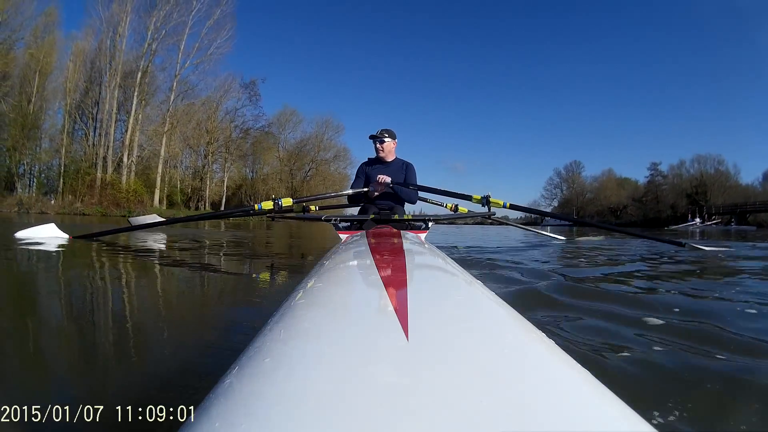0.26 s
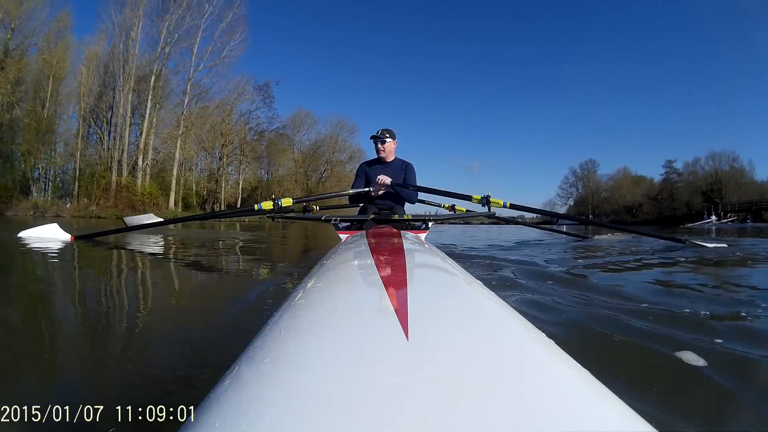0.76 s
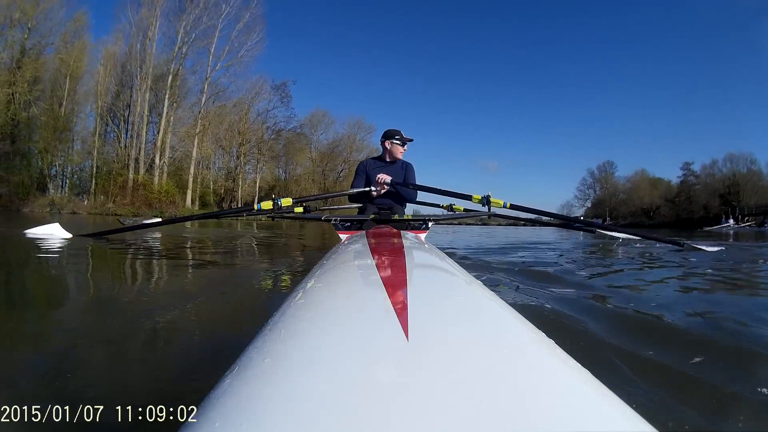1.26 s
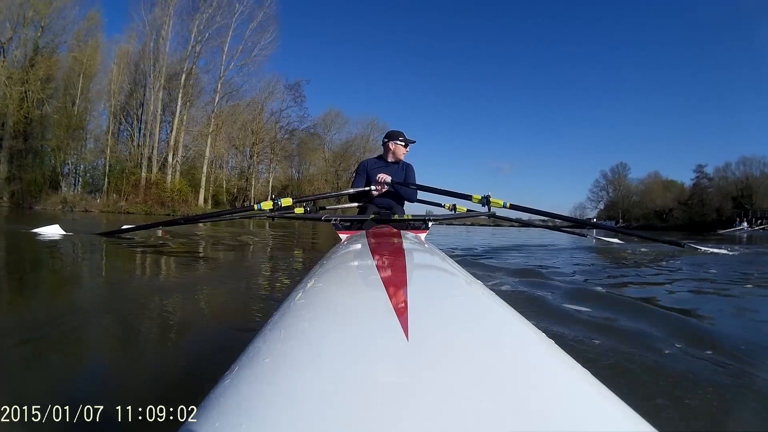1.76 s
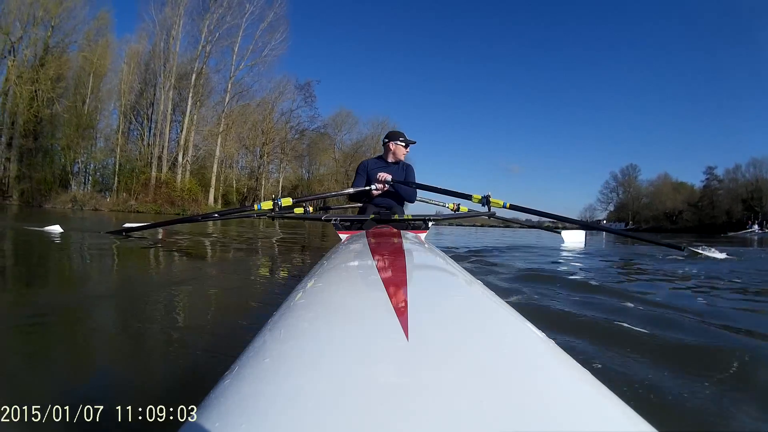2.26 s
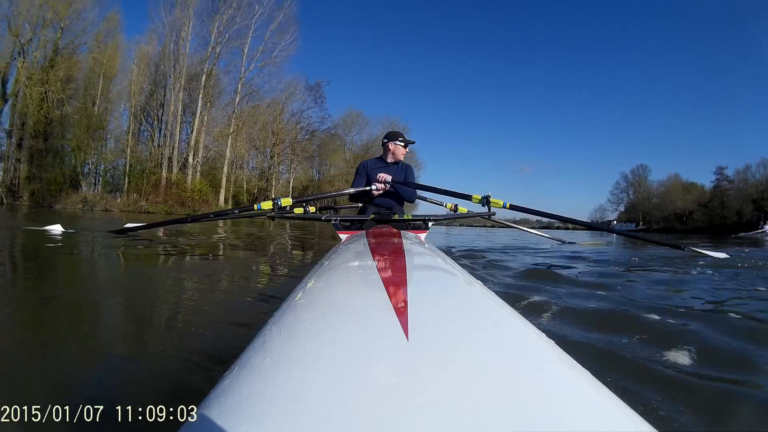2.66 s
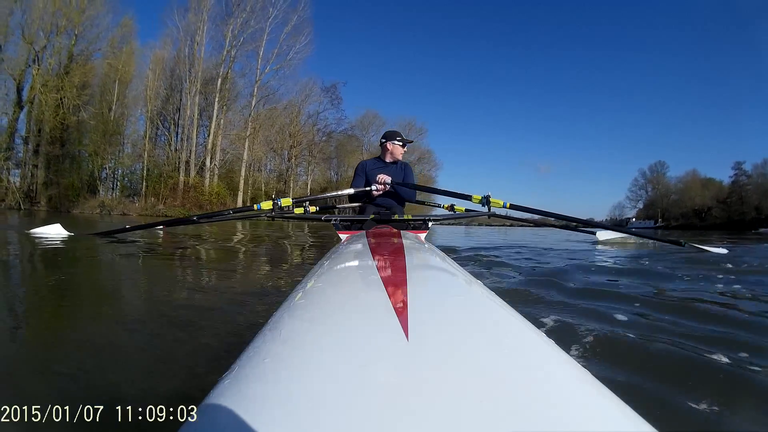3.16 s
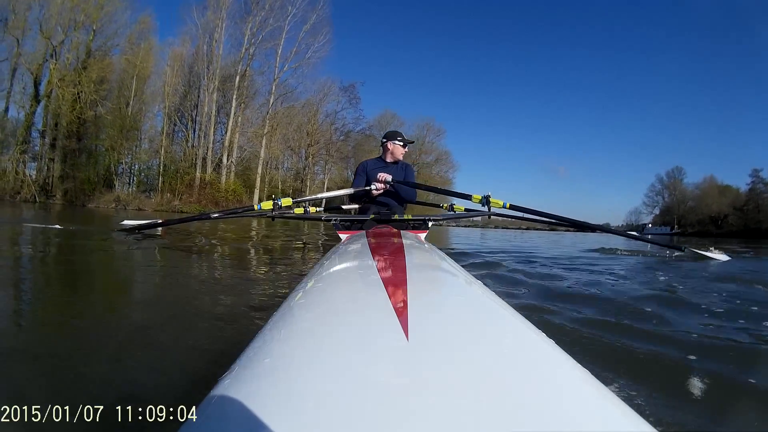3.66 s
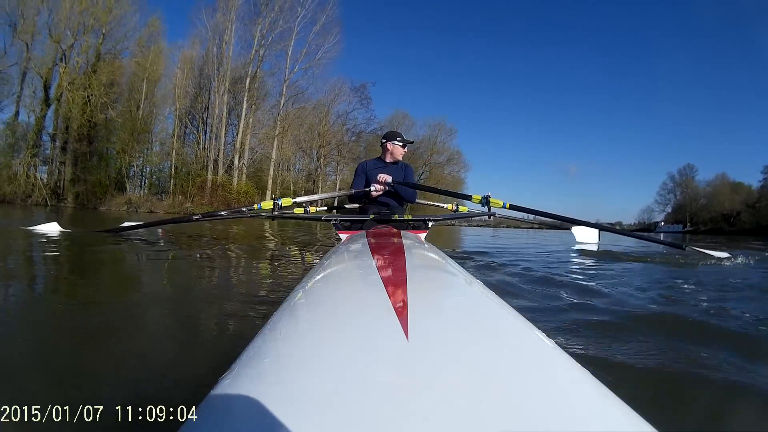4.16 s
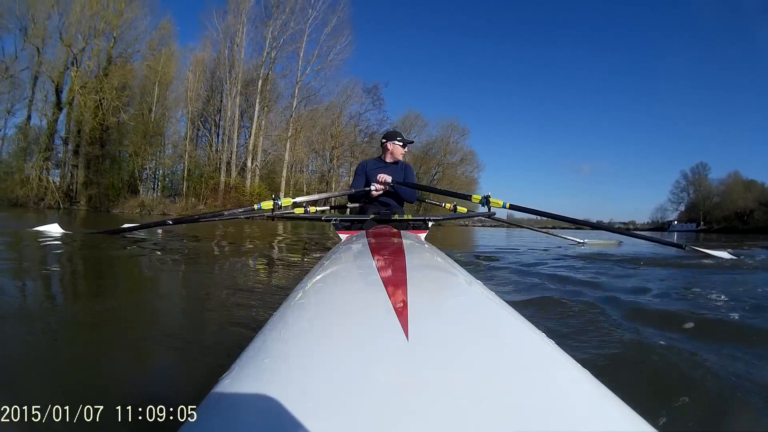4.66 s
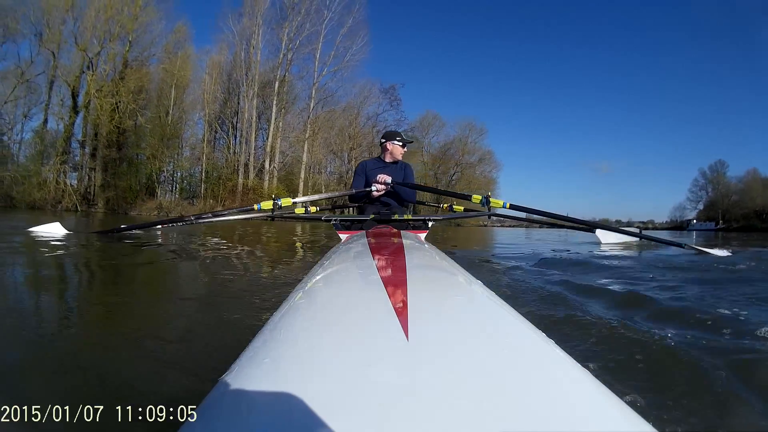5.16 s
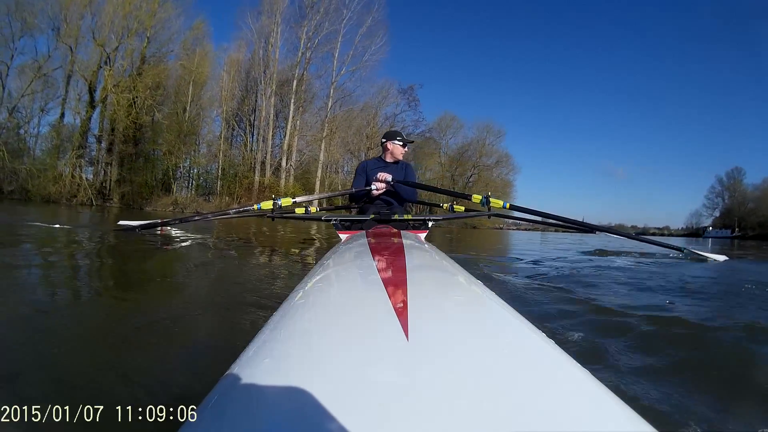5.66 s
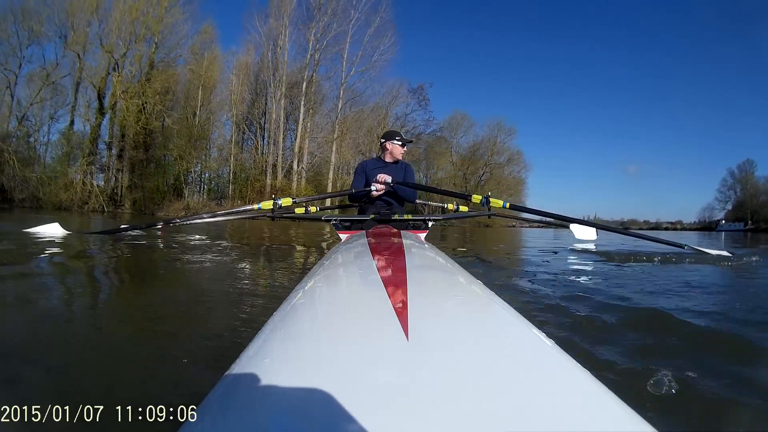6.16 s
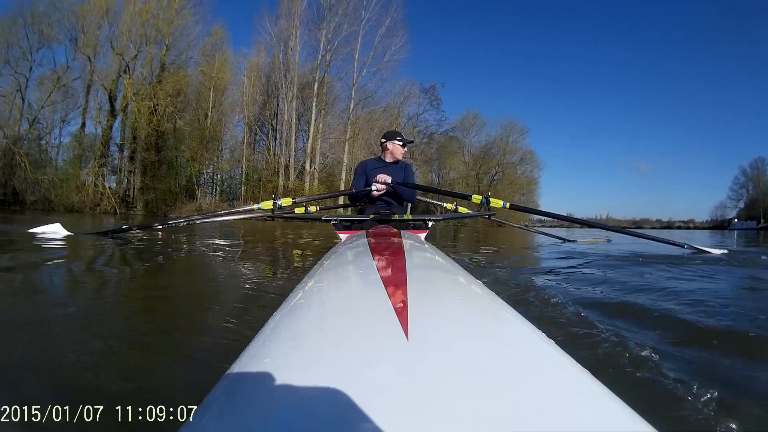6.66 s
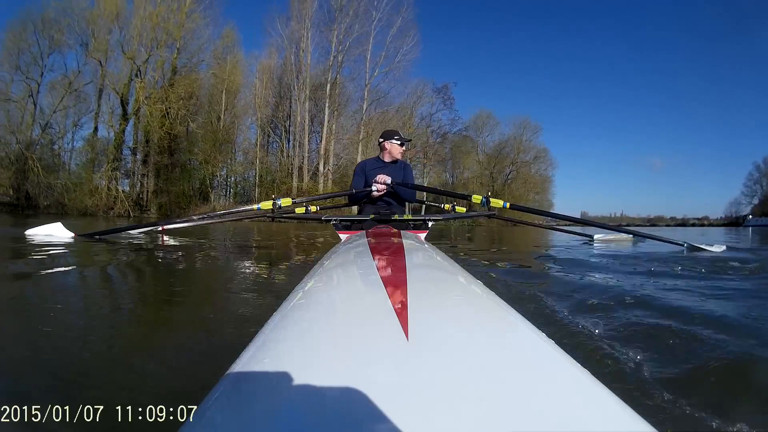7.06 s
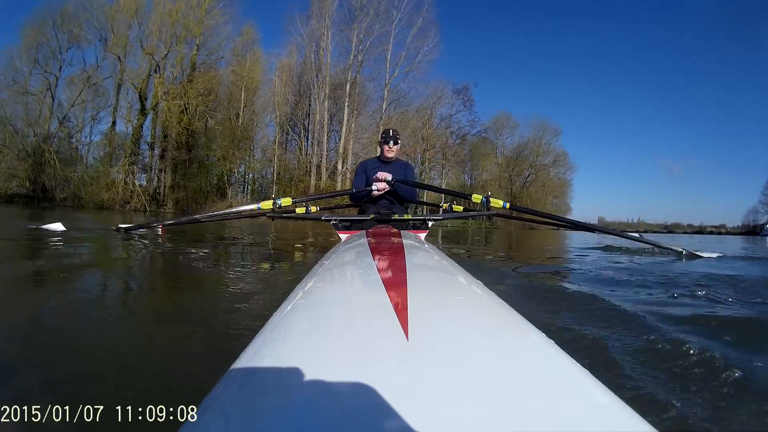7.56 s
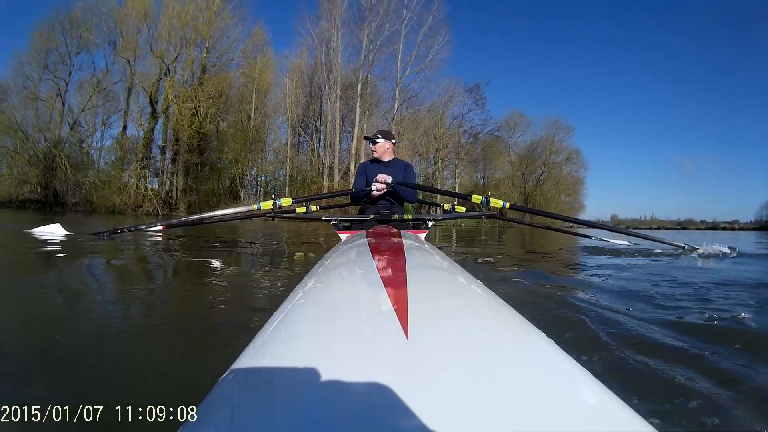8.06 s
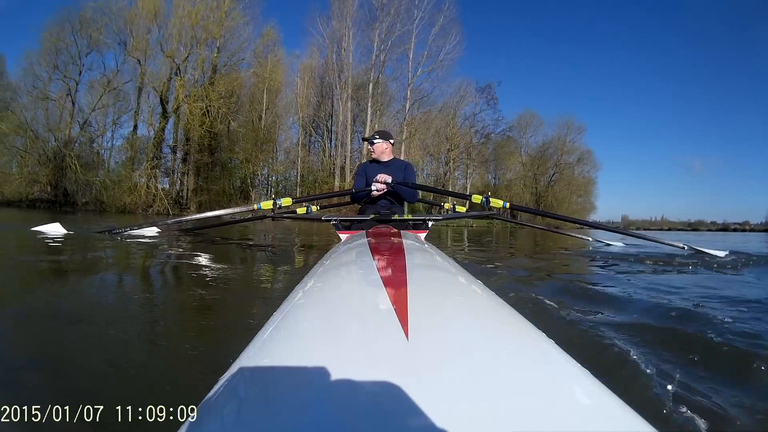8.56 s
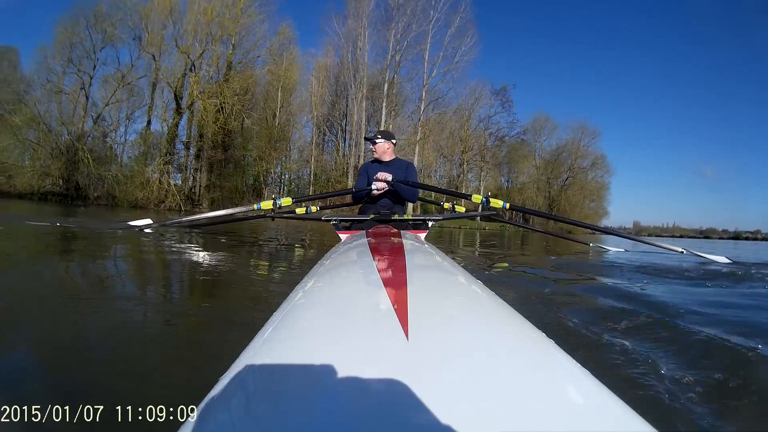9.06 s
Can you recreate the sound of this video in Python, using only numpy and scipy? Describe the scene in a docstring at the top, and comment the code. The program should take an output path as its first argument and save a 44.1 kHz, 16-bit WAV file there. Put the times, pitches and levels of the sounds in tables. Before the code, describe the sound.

Hollow knocks and low hull thumps come in rhythmic clusters as a rowing boat moves along, water lapping underneath and a plastic case rattling sharply.

```python
"""A camera in a sealed case rides on the deck of a rowing shell and hears the boat through the hull.
First come soft knocks, made of short struck notes and noise; from 1.3 s blows come in busy groups and
the hull swings as two low wavering tones. From 2.84 to 3.29 s water gurgles in long faint notes. After hard
blows near 3.7, 5.6 and 7.7 s the case rattles in noisy cracks. Small parts ping and rub in between; the last
second or so is calmer. Throughout, filtered noise and tiny notes make water lap and gurgle under the deck,
and the electronics add hiss and a thin whine."""
import sys
import numpy as np
from scipy import signal
from scipy.fft import rfft, irfft
from scipy.io import wavfile
from scipy.ndimage import uniform_filter1d

SR = 44100
rng = np.random.default_rng(int(sys.argv[2]) if len(sys.argv) > 2 else 0)


def wav_record(signal):
    """Record a signal, one row per channel, as 16-bit PCM in the file named by sys.argv[1]."""
    frames = np.transpose(np.atleast_2d(signal))
    bounded = np.clip(frames, -1, 1)
    # unit amplitude maps onto the largest positive 16-bit level
    quanta = np.round(bounded * 32767).astype(np.int16)
    wavfile.write(sys.argv[1], SR, quanta)


N = 411012

# Resonances of the deck panels: (frequency [Hz], nominal width [Hz], level [dB])
DECK_MODES = [(140, 71, -1), (291.2, 51.5, 3), (320, 51.5, 2.5), (391, 33.5, -1.5), (459.3, 29.6, -1),
              (697, 237, -17.5)]
# Resonances of the rigger, which holds the oars: (frequency [Hz], nominal width [Hz], level [dB])
RIGGER_MODES = [(1170, 118, 1), (1340, 91, 0), (1680, 151, 1), (2860, 1220, -17.5)]
# Resonances of the plastic case: (frequency [Hz], nominal width [Hz], level [dB])
CASE_MODES = [(1800, 360, -5.5), (3060, 1100, -8), (4370, 340, -2.5), (6440, 540, 2), (10000, 280, 2.5),
              (11300, 280, -2.5), (12400, 950, -10), (15300, 920, -17)]
# Oars and seats knock; the long faint notes from 2.84 to 3.29 s are water gurgling:
# (time [s], note peak [dB], deck note [Hz], time to fade by 60 dB [s])
KNOCKS_AND_GURGLES = [(0.003, -36.5, 438, 0.064), (0.183, -39.5, 362, 0.041), (0.272, -45, 325, 0.11),
                      (0.548, -45, 341, 0.14), (1.123, -40, 293, 0.052), (1.223, -41.5, 306, 0.073),
                      (1.251, -38.5, 368, 0.038), (1.305, -29.5, 470, 0.056), (1.446, -25, 425, 0.11),
                      (1.454, -30, 431, 0.11), (1.574, -16, 409, 0.038), (2.068, -44, 375, 0.045),
                      (2.177, -36.5, 389, 0.16), (2.228, -22.5, 373, 0.018), (2.294, -21, 435, 0.047),
                      (2.348, -29, 460, 0.047), (2.84, -53.5, 269, 0.27), (2.95, -54, 312, .16),
                      (3.069, -55, 266, 0.36), (3.285, -52.5, 364, 0.16), (3.464, -40.5, 328, 0.06),
                      (3.562, -24, 391, 0.052), (3.664, -22, 392, 0.096), (3.695, -21.5, 414, 0.06),
                      (3.887, -38, 374, 0.065), (4.063, -36.5, 384, 0.038), (4.225, -41.5, 431, 0.11),
                      (4.34, -25, 394, 0.034), (4.349, -18, 410, 0.027), (5.145, -48.5, 298, 0.081),
                      (5.399, -40, 320, 0.028), (5.503, -31, 376, 0.034), (5.55, -28, 387, 0.098),
                      (5.571, -17, 398, 0.066), (5.608, -30.5, 467, 0.054), (6.316, -41, 374, 0.024),
                      (6.368, -23.5, 360, 0.017), (6.439, -20.5, 442, 0.047), (7.115, -37, 392, 0.099),
                      (7.447, -43, 387, 0.085), (7.515, -34, 388, 0.029), (7.616, -35.5, 435, 0.027),
                      (7.703, -29.5, 389, 0.13), (8.143, -50, 396, 0.096), (8.322, -51, 306, 0.2),
                      (8.324, -46, 450, 0.034), (8.43, -46, 438, 0.038), (8.557, -35.5, 359, 0.067)]
# Short pings of the rigger: (time [s], note peak [dB], middle pitch [Hz], time to fade by 60 dB [s])
PINGS = [(0.081, -55, 1720, .03), (0.089, -53, 1340, 0.056), (0.269, -51.5, 1750, 0.032),
         (1.131, -50.5, 1125, 0.058), (1.298, -33, 1340, 0.0059), (1.306, -37, 1750, 0.028),
         (1.353, -41, 764, .06), (1.383, -51.5, 1680, 0.037), (1.445, -38, 1750, 0.032),
         (1.502, -36, 1220, 0.023), (1.536, -29, 1554, 0.051), (1.575, -33, 1264, 0.049),
         (1.594, -39, 1340, 0.11), (1.64, -42, 684, 0.14), (1.684, -34, 1290, 0.071),
         (1.691, -37.5, 1240, 0.099), (1.752, -59, 1470, .015), (1.773, -30, 1680, 0.041),
         (1.839, -38.5, 1097, 0.064), (2.291, -34, 1800, 0.026), (2.298, -41.5, 1313, 0.089),
         (2.347, -33, 1730, 0.015), (2.353, -43.5, 1230, 0.036), (2.392, -46.5, 1680, 0.091),
         (2.567, -45, 1680, 0.024), (3.559, -39, 1736, 0.039), (3.81, -25, 1664, 0.061),
         (4.063, -50.5, 1750, .025), (4.28, -52.5, 1706, 0.18), (4.338, -36.5, 1810, 0.023),
         (4.351, -42, 1790, 0.035), (4.357, -41, 1300, 0.11), (4.737, -55, 1680, 0.036),
         (5.499, -43.5, 1680, 0.05), (5.564, -27, 1760, 0.006), (5.655, -48, 770, 0.08),
         (6.432, -30, 1745, 0.026), (6.595, -52.5, 894, 0.086), (6.917, -38, 1420, 0.0041),
         (7.008, -54, 1540, 0.024), (7.1, -44, 1203, 0.066), (7.179, -35, 1580, 0.016),
         (7.194, -43, 1260, 0.049), (7.452, -47, 1520, 0.046), (7.493, -29, 1490, 0.016),
         (7.612, -46, 1950, .03), (7.617, -40.5, 1270, 0.03), (7.702, -42.5, 1750, 0.05),
         (7.718, -36, 1680, 0.055), (8.146, -51, 1150, .04), (8.444, -49, 1300, 0.032),
         (8.85, -47, 1250, 0.041), (9.065, -57, 1625, 0.058)]
# High ticks of loose fittings: (time [s], peak [dB], note [Hz])
FITTING_TICKS = [(1.3407, -49, 3520), (1.3415, -51, 4080), (1.58, -54, 4500), (1.5963, -52, 3060),
                 (5.7884, -48.5, 3190), (7.5268, -55.5, 4100)]
# An oar sleeve rubs as it turns in its lock:
# (start [s], end [s], drive of rigger [dB], drive of deck [dB], note that sings [Hz])
RUBS = [(.34, 0.552, -72, -76, 1720), (1.87, 1.98, -59, -63, 1300), (2.517, 2.598, -61.5, -54.5, 1703),
        (3.458, 3.55, -70, -48.5, 1670), (4.136, 4.187, -52.5, -47, 1300), (5.159, 5.256, -64.5, -60, 1300),
        (5.386, 5.478, -78, -52, 1680), (7.582, 7.675, -59, -48, 1130), (8.131, 8.183, -64.5, -56, 1160)]
# The camera hits its case, the clear cracks: (time [s], strength [dB])
CASE_HITS = [(2.31, -50), (2.357, -49), (3.6616, -35), (3.6802, -33), (3.6892, -27), (3.695, -21.5),
             (3.7073, -23.5), (3.713, -23), (3.727, -30.5), (3.7486, -36.5), (4.4154, -50), (5.546, -35),
             (5.562, -34.5), (5.566, -33), (5.5934, -27.5), (5.5987, -28), (5.603, -17.5), (5.6147, -26.5),
             (5.62, -23), (5.635, -38), (5.647, -41), (5.672, -49), (5.731, -50), (6.433, -48),
             (6.451, -46), (6.467, -43), (6.477, -43), (6.494, -37.5), (6.497, -32.5), (6.511, -35),
             (6.518, -43), (7.7295, -33), (7.7381, -22), (7.752, -29), (7.7563, -25), (7.772, -27.5),
             (7.789, -34.5), (7.7951, -29.5), (7.802, -34), (7.824, -41)]
# Small bounces between the cracks: (start [s], end [s], typical strength [dB])
CHATTER = [(3.662, 3.764, -52), (5.581, 5.638, -48), (6.47, 6.499, -44.5), (7.728, 7.807, -47)]
# A faint fizz after hard blows: (start [s], end [s], strength [dB])
FIZZ = [(3.7, 3.93, -62.5), (5.677, 5.93, -64.5), (7.768, 7.96, -59.5)]
# Oars and rowers jolt the boat:
# (time [s], first hull mode [dB], second hull mode [dB], slosh under the deck [dB])
JOLTS = [(0.0, -37, -37, -40.5), (0.3, -43.5, -50.5, -54), (0.44, -41.5, -72, -55), (0.96, -55, -60, -64),
         (1.17, -46, -51.5, -58), (1.32, -39.5, -45, -39), (1.488, -31.5, -43, -40),
         (1.596, -36.5, -40.5, -42.5), (1.744, -41, -42.5, -44), (1.96, -49.5, -69, -73),
         (2.316, -32.5, -33.5, -41), (2.571, -52, -64, -55.5), (3.26, -59.5, -64, -60),
         (3.585, -33, -53, -45.5), (3.645, -25.5, -51, -38), (3.719, -28, -40.5, -39),
         (3.92, -58, -58, -48.5), (4.256, -41.5, -51, -51), (4.394, -31.5, -39, -41.5),
         (4.56, -52, -52.5, -49), (5.188, -57, -62.5, -71), (5.42, -50.5, -59, -67),
         (5.515, -37.5, -60, -56), (5.56, -29.5, -63, -38), (5.63, -29, -40.5, -38.5),
         (5.715, -33.5, -58, -53), (6.375, -39.5, -57, -53), (6.462, -33, -37.5, -38),
         (6.617, -49.5, -58, -56), (7.549, -42, -50.5, -45), (7.655, -50, -39, -43.5),
         (7.747, -27, -40.5, -35.5), (8.19, -47.5, -59, -52), (8.331, -44.5, -51, -56),
         (8.592, -38.5, -48, -59)]
# Steady lapping along the hull: (time [s], level on the deck [dB], level on the rigger [dB])
LAPPING = [(0.0, -54, -73), (0.95, -56.5, -71), (1.55, -46, -72), (2.05, -61, -73), (2.7, -70, -82),
           (3.15, -56.5, -67.5), (3.5, -72, -79), (4.15, -58.5, -63), (4.65, -61.5, -77),
           (5.45, -71.5, -65), (6.0, -61.5, -71), (6.75, -73.5, -78), (7.2, -53.5, -57.5),
           (7.4, -62.5, -67), (8.0, -70, -68.5), (8.5, -56, -69), (9.32, -75, -75.5)]
# Colour of the hiss: (frequency [Hz], relative level [dB])
HISS_COLOUR = [(25, 3.5), (50, -5), (120, -6.5), (300, -16.5), (600, -16.5), (1500, -21.5), (3300, -27.5),
               (8000, -28.5), (15800, -28), (16200, -75)]

HULL_HZ, SECOND_HZ = 51.5, 107.4  # middle pitches of the two hull modes
SWING_RISE, SWING_FALL = 260, 98.5  # dB per s up to and down from a peak
SWING_CALM_DB = -68  # level between jolts
SECOND_RISE, SECOND_FALL = 185, 96  # dB per s
SLOSH_RISE, SLOSH_FALL = 203, 147  # dB per s
SLOSH_TREBLE_DB = -11  # slosh on the rigger, relative to the deck
LEAD_S = 0.0017  # jolt levels peak this long before the listed times
CHATTER_PER_S = 170
TICK_T60 = 0.025  # s
HISS_DB = -62  # before the hull's loudness and the swells change it
WHINE_HZ, SWITCH_HZ = 8659, 33
EDGE_HZ = 17300  # upper limit of the sound


def gain_of(db):
    """Turn decibels into a plain multiplier."""
    return 10 ** (np.asarray(db) / 20)


def evened(x):
    """Scale to an average (rms) strength of 1."""
    return x / np.sqrt(np.mean(x ** 2) + 1e-20)


def curves(rows):
    """Every column after the time, sample by sample."""
    s, *columns = np.transpose(rows)
    return [np.interp(np.arange(N) / SR, s, c) for c in columns]


def add(mix, s, sound):
    """Lay a sound into the mix from time s, cut off at the end."""
    part = mix[round(s * SR):][:len(sound)]
    part += sound[:len(part)]


def drift(per_s):
    """Slow random wander of rms 1, turning about per_s times a second."""
    low_pass = signal.butter(2, per_s, fs=SR, output="sos")
    return evened(signal.sosfilt(low_pass, rng.standard_normal(N)))


def body(x, modes):
    """Sum of resonances, each passed twice for steep skirts, neighbours in opposite phase."""
    out = 0
    for k, (hz, width, db) in enumerate(modes):
        # each pass is wider than the nominal width, as two passes narrow the peak
        b, a = signal.iirpeak(hz, hz / (2.03 * width), SR)
        once = signal.lfilter(b, a, x)
        out = out + (-1) ** k * gain_of(db) * signal.lfilter(b, a, once)
    return out


def ring(hz, t60, rise, sag=0.):
    """One struck note of peak 1 with a soft start; its pitch sinks by the share sag over t60."""
    t = np.arange(0, 3.1 * t60, 1 / SR)
    fade = (1 - np.exp(-t / rise)) ** 2 * gain_of(-60 * t / t60)
    turns = hz * t * (1 + sag * (.25 - t / t60 / 2))
    note = fade * np.sin(2 * np.pi * turns)
    return note / abs(note).max()


def hull():
    """Two bending modes swing as slightly unsteady tones, and the mount creaks along."""
    db = swing_db()
    second_db = jolted(column=2, rise=SECOND_RISE, fall=SECOND_FALL, calm_db=-np.inf)

    climb = uniform_filter1d(np.gradient(db) * SR, size=4000)  # dB per s
    # the pitch is high while the boat is being pushed
    turns = np.cumsum(HULL_HZ + .03 * climb + 2.2 * drift(per_s=10.11)) / SR
    flutter_db = 2.5 * drift(per_s=12.)
    push = gain_of(db + flutter_db) * np.sqrt(2) * np.sin(2 * np.pi * turns)
    swing = body(push, [(HULL_HZ + 3, 30, 0.)])  # the hull cannot follow sudden changes

    second_turns = np.cumsum(SECOND_HZ + 4 * drift(per_s=5.)) / SR
    waver_db = 3 * drift(per_s=45.)
    second = np.sqrt(2) * gain_of(second_db + waver_db) * np.sin(2 * np.pi * second_turns)
    return swing + second + creak(turns, db)


def creak(turns, db):
    """The mount creaks for a few milliseconds every half cycle, as the swing passes through its middle."""
    uneven_db = 1.5 * drift(per_s=60.) - 2 * (turns % 1 > .5)
    crossings = np.diff(np.floor(2 * turns), prepend=0) * gain_of(uneven_db)
    wide_db = uniform_filter1d(db, size=2600)
    ticks = crossings * gain_of(1.58 * (wide_db + 16.5))  # slack is only taken up by wide swings

    every_sixth = np.arange(N) % 6 == 0
    grain = np.convolve(np.sign(rng.standard_normal(N)) * every_sixth, np.hanning(9), "same")
    scrape = np.convolve(ticks, np.hanning(190), "same") * grain
    click = np.convolve(ticks, np.hanning(15), "same")  # one dull click within the scrape
    modes = [(1300, 424, 3.0), (1750, 520, -4.0), (3160, 480, -8), (6700, 330, -27)]
    return gain_of(-9.0) * body(0.83 * scrape + 1.17 * click, modes)


def swing_db():
    """Level of the first hull mode, before its flutter."""
    return jolted(column=1, rise=SWING_RISE, fall=SWING_FALL, calm_db=SWING_CALM_DB)


def jolted(column, rise, fall, calm_db):
    """Level in dB that climbs to each jolt's peak and dies away, powers added over a calm level."""
    t = np.arange(0, N + 64, 64) / SR  # every 64th sample is enough
    jolts = np.array(JOLTS)
    late = t + LEAD_S - jolts[:, :1]
    db = jolts[:, column, None] - np.where(late < 0, -rise * late, fall * late)
    power = (gain_of(db) ** 2).sum(0) + gain_of(calm_db) ** 2
    return np.interp(np.arange(N) / SR, t, 10 * np.log10(power))


def knocks_and_gurgles():
    """Each knock or gurgle sounds one note; a burst of noise with it wakes deck panels and rigger."""
    notes, burst = np.zeros((2, N))
    t = np.arange(SR // 4) / SR
    for s, db, hz, t60 in KNOCKS_AND_GURGLES:
        add(notes, s, gain_of(db) * ring(hz, t60, rise=0.0016 + 0.022 * t60))
        add(burst, s, gain_of(db - 60 * t / 0.21) * np.minimum(t / 0.0066, 1))
    burst *= rng.standard_normal(N)
    return notes + gain_of(7.5) * body(burst, DECK_MODES) + gain_of(-14.5) * body(burst, RIGGER_MODES)


def rattle():
    """Noisy cracks of a few milliseconds in the plastic case, hard ones brighter, and a faint fizz."""
    t = np.arange(SR // 2) / SR
    bounces = []
    for start, end, db in CHATTER:
        for s in np.arange(start, end, 1 / CHATTER_PER_S):
            bounces.append((s + rng.random() / CHATTER_PER_S, db + 5.3 * rng.standard_normal()))

    blow = (t / 0.0013 * np.exp(1 - t / 0.00098)) ** 2
    tail = gain_of(-4.0 - 60 * t / 0.024) * (1 - np.exp(-t / 0.00098))
    contact, snaps, fizz = np.zeros((3, N))
    for s, db in CASE_HITS + bounces:
        add(contact, s, gain_of(db) * (blow + tail))
    for s, db in CASE_HITS:
        # one clean snap, which only stands out in the hardest blows
        add(snaps, s + .001, gain_of([2.6 * db + 39]))
    for start, end, db in FIZZ:
        add(fizz, start, gain_of(db) * np.sqrt(np.hanning(round((end - start) * SR))))
    fizz *= gain_of(3 * drift(per_s=200.))

    noise = rng.standard_normal((3, N))
    grit = gain_of(0.38 * drift(per_s=4600.0)) * noise  # surfaces chatter in many tiny cracks
    # a stiffer contact reaches the higher modes
    hard = contact * (contact * gain_of(27.0) + 1e-9) ** 0.79
    low_cracks = gain_of(8) * body(contact * grit[0], CASE_MODES[:4])
    high_cracks = gain_of(3.0) * body(hard * grit[0], CASE_MODES[4:])

    through_air = gain_of(-4.0) * body(contact * grit[1], [(6660, 4200, 0.)])
    dull = signal.butter(6, 13000, fs=SR, output="sos")
    through_air = signal.sosfilt(dull, through_air)  # the case wall stops the highest treble
    fizzing = body(fizz * noise[2], [(3600, 1200, 1), (6250, 600, 0.85), (10200, 1500, 7.0)])
    return low_cracks + high_cracks + body(snaps, CASE_MODES[1:]) + through_air + fizzing


def pings():
    """Struck rigger notes waver and sink, with short noise puffs in nearby modes; fittings tick."""
    notes, puff, ticks = np.zeros((3, N))
    t = np.arange(SR // 8) / SR
    for s, db, hz, t60 in PINGS:
        add(notes, s, gain_of(db) * ring(hz, t60, rise=0.0012, sag=0.053))
        add(puff, s, gain_of(db - 60 * t / 0.095) * np.minimum(t / 0.0005, 1))
    for s, db, hz in FITTING_TICKS:
        add(ticks, s, gain_of(db) * ring(hz, TICK_T60, rise=0.00092))
    notes *= 1 + .3 * drift(per_s=120.)  # wavering strength
    puffs = gain_of(4.0) * body(puff * rng.standard_normal(N), RIGGER_MODES[:3])
    return notes + ticks + puffs


def rubs():
    """Dense uneven slips drive the rigger, where one note sings out, and through it the deck."""
    slips = rng.standard_normal(N) * gain_of(3 * drift(per_s=150.))
    rigger = evened(body(slips, RIGGER_MODES[:3]))
    deck = evened(body(slips, DECK_MODES))
    out = np.zeros(N)
    for start, end, rigger_db, deck_db, hz in RUBS:
        span = slice(round(start * SR), round(end * SR))
        sings = evened(body(slips[span], [(hz, 45, 0.)]))
        on_rigger = gain_of(rigger_db) * (0.81 * rigger[span] + 0.89 * sings)
        sound = on_rigger + gain_of(deck_db) * deck[span]
        add(out, start, signal.windows.tukey(len(sound), .3) * sound)
    return out


def water():
    """Gurgles and lumpy wash drive the deck panels and the rigger."""
    deck_db, rigger_db = curves(LAPPING)
    slosh = gain_of(jolted(column=3, rise=SLOSH_RISE, fall=SLOSH_FALL, calm_db=-np.inf))
    lumps_db = [4.4 * drift(per_s=17.0), 2.3 * drift(per_s=38.0)]
    wash = rng.standard_normal((2, N)) * gain_of(lumps_db)

    deep = gurgle(235.2, 484.3, per_s=45., t60=0.094, spread_db=1.5)
    low = evened(body(wash[0], DECK_MODES)) + evened(body(deep, DECK_MODES))
    trickle = gurgle(1050, 1900, per_s=70., t60=.045, spread_db=3.5, sag=-.2)  # pitch glides up
    high = evened(body(wash[1], RIGGER_MODES)) + 0.98 * evened(body(trickle, RIGGER_MODES))

    # lapping and slosh add as powers
    deck_level = np.hypot(gain_of(deck_db), slosh)
    rigger_level = np.hypot(gain_of(rigger_db), gain_of(SLOSH_TREBLE_DB) * slosh)
    return deck_level * evened(low) + rigger_level * evened(high)


def gurgle(lo_hz, hi_hz, per_s, t60, spread_db, sag=0.):
    """Air pockets of uneven size under the hull ping at random, each on one steady or gliding pitch."""
    starts = rng.random(N) < per_s / SR
    size = gain_of(spread_db * np.minimum(rng.exponential(1, N), 4)) * starts
    pitches = np.geomspace(lo_hz, hi_hz, num=16)
    which = rng.integers(len(pitches), size=N)
    out = np.zeros(N)
    for k, hz in enumerate(pitches):
        out += signal.oaconvolve(size * (which == k), ring(hz, t60, t60 / 12, sag))[:N]
    return evened(out)


def electronics():
    """Hiss that swells once a second, and a whine with a switching phase; both rise with the hull."""
    t, hz = np.arange(N) / SR, np.fft.rfftfreq(N, 1 / SR)
    f, db = np.transpose(HISS_COLOUR)
    colour = gain_of(np.interp(np.log(hz + 1), np.log(f), db))
    hiss = evened(irfft(rfft(rng.standard_normal(N)) * colour, N))
    swelling = abs((t - .82 + .5) % 1.0 - .5) < .08
    swell_db = 2.4 * uniform_filter1d(1. * swelling, size=900)

    loud = uniform_filter1d(swing_db(), size=4000)
    switch = 1.0 * np.sign(np.sin(2 * np.pi * SWITCH_HZ * t))  # phase jumps to and fro, in radians
    whine_db = -68.0 + 0.41 * np.maximum(loud + 55, 0)
    whine = gain_of(whine_db) * np.sin(2 * np.pi * WHINE_HZ * t + switch)
    return gain_of(HISS_DB + swell_db + 0.088 * (loud + 82)) * hiss + whine


def scene():
    """All the layers together, as one channel."""
    boat = hull() + knocks_and_gurgles() + rattle() + pings() + rubs()
    return (boat + water() + electronics())[None]


def record(dry):
    """A low-pass filter takes away the highest treble."""
    low_pass = signal.firwin(127, EDGE_HZ, window=("kaiser", 9), fs=SR)
    return signal.oaconvolve(dry, low_pass[None], "same")


dry = scene()
out = record(dry)
wav_record(out)
```